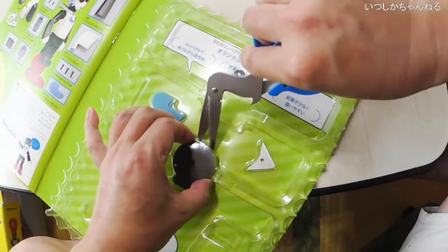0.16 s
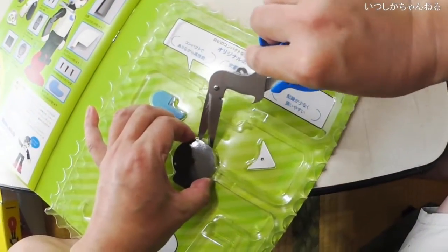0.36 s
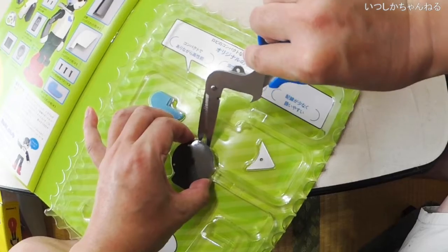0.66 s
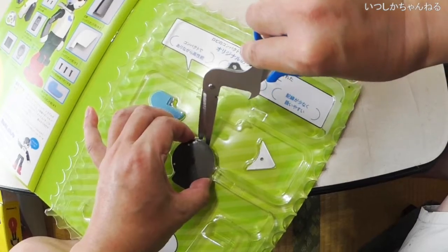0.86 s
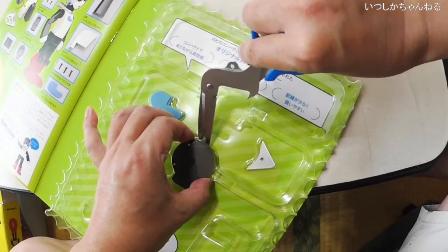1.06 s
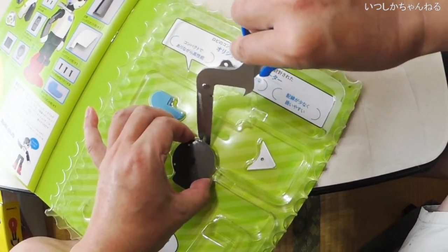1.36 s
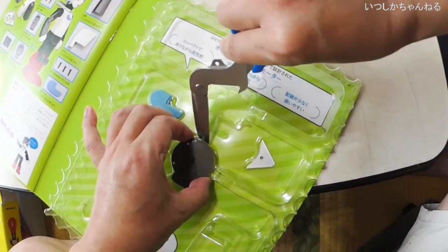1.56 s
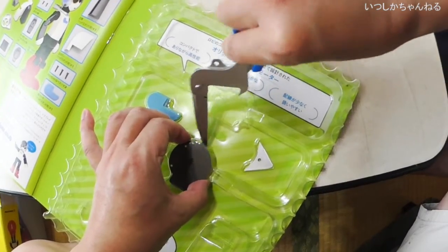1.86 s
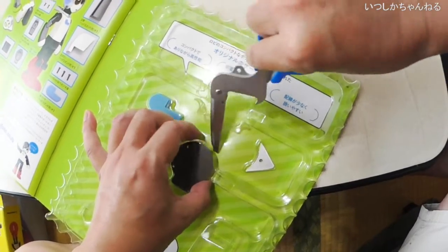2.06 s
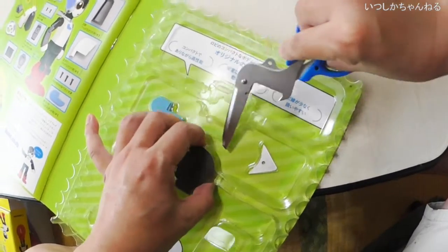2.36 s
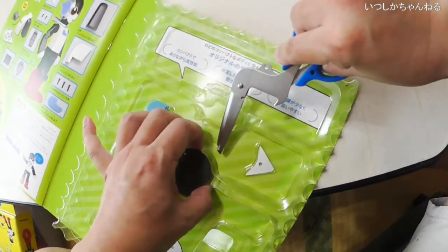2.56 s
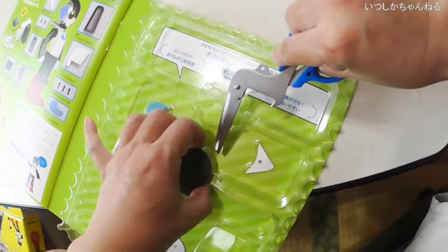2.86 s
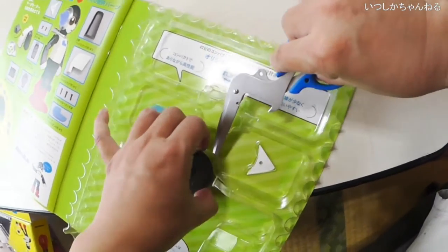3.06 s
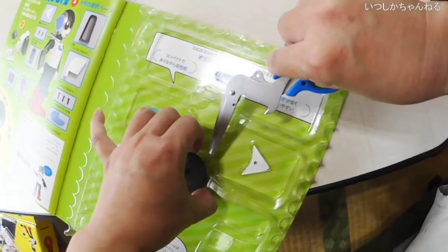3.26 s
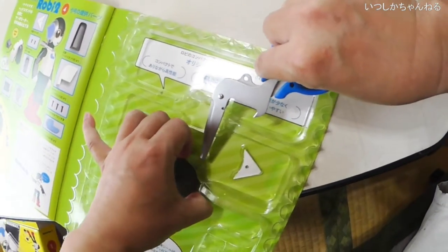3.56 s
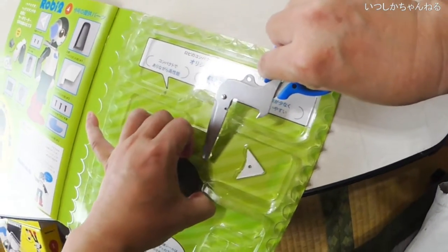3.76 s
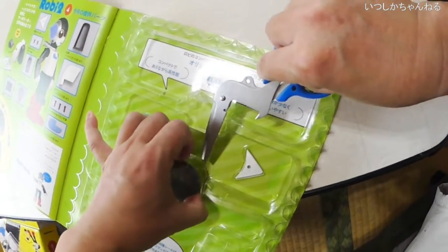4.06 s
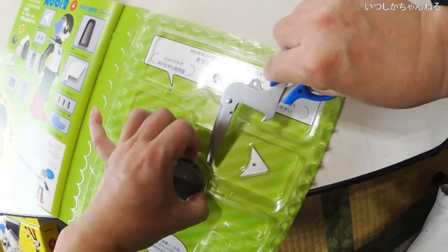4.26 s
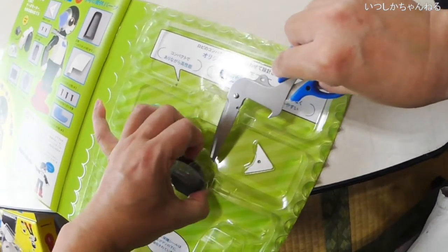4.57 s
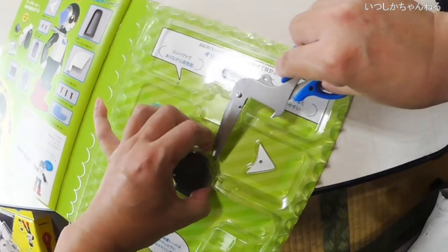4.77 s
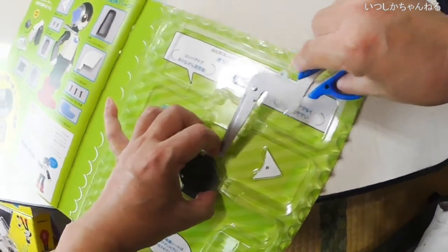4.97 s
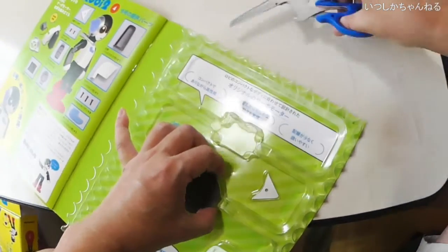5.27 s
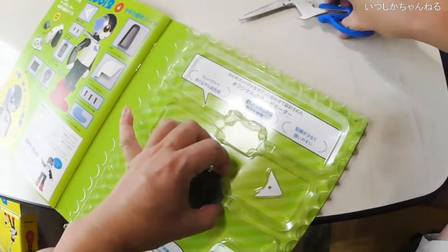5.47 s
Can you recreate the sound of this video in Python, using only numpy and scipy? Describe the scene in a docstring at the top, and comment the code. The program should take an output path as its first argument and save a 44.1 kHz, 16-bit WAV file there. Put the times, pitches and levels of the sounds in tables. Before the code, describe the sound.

A close indoor recording of scissors cutting a stiff, hollow plastic blister pack on a table. It opens with a short rustle and a quick run of crackling clicks, fading by 0.3 s. Sparse ticks and soft rubbing lead to a bright snap near 0.95 s. More light crackles follow from 1.2 s, then a hard snap at 1.8 s and a close pair around 2.0 s. Dense buckling and rustling continue, with snaps at 2.3, 2.4 and a strong one at 2.7 s. After a brief thinning, crackles build to snaps at 3.4 s, a heavy one at 3.8 s and a sharp pair at 3.9 s. It is quieter until about 4.5 s, then busy crinkling returns with clicks at 4.7 and 4.9 s. Rustling thins toward a last snap near 5.5 s. Short hollow ringing, slight overload, a small room's answer and faint fluctuating hiss accompany everything.

```python
"""Steel scissors work their way through a stiff plastic blister pack on a table in a small room.
Strokes of the blades rub and rustle (filtered noise), and the sheet buckles in runs of clicks (fading sines).
Where it gives way, a stronger click sounds; overload of the recorder adds a bright burst and a low thump.
Resonances of the hollow pack ring on, and noise tails make the room's brief answer.
Below lie a faint room tone and recorder hiss, which a noise suppressor lets through around the strokes."""
import sys
import numpy as np
from scipy import signal
from scipy.fft import rfft, irfft, next_fast_len
from scipy.io import wavfile
from scipy.ndimage import uniform_filter1d

SR = 44100
rng = np.random.default_rng(int(sys.argv[2]) if len(sys.argv) > 2 else 0)


def pcm_store(signal):
    """Save signal as 16-bit PCM."""
    levels = np.round(np.clip(np.atleast_2d(signal), -1, 1) * 32767)
    wavfile.write(sys.argv[1], SR, levels.astype(np.int16).T)


N = 248283  # length in samples

# The blades break through: t/s, flex level/dB, body level/dB, edge level/dB, overload burst level/dB,
# overload thump level/dB, share sent into the room/dB
BREAKTHROUGHS = [(0.9617, -28.5, -26, -27, -28, -34.5, -6),
                 (1.814, -22.5, -18.5, -18.5, -28.5, -35.5, -7.5), (2.0185, -34, -24, -28, -49, -55.5, -3),
                 (2.0377, -35.5, -22, -21.5, -40.5, -62, -11), (2.271, -36, -30.5, -26, -48, -55, -20.5),
                 (2.4205, -43, -20.5, -21, -46, -72, -10.5), (2.4925, -38.5, -34, -37.5, -42, -64.5, -10.5),
                 (2.722, -22.5, -17, -23.5, -31, -37, -14.5), (2.7894, -27.5, -28.5, -31, -43.5, -71, -21),
                 (3.4232, -35.5, -31, -25, -38, -61, -17), (3.4512, -32.5, -18.5, -21, -36, -63.5, -11),
                 (3.7845, -19, -16, -25.5, -45, -55.5, -9), (3.919, -37, -23.5, -26, -36.5, -60, -4.5),
                 (3.9447, -29, -17.5, -20.5, -27, -34.5, -22.5),
                 (4.6722, -26.5, -25, -25.5, -35.5, -48, -9), (4.9181, -38, -26, -29, -38, -50.5, -8.5),
                 (5.4664, -28, -29, -23.5, -33.5, -44, -2.5)]


def amp(db):
    """Turn decibels into a plain factor."""
    return 10 ** (np.asarray(db) / 20)


def unit(x):
    """Bring a sound to an average (RMS) strength of 1."""
    return x / np.sqrt(np.mean(x ** 2) + 1e-20)


def along(points, hz):
    """Read a curve of (frequency, value) points, on a log frequency axis."""
    f, value = np.transpose(points)
    return np.interp(np.log(hz + 1), np.log(f + 1), value)


def filtered(x, response):
    """Multiply the spectrum of x by a function of frequency, which may also shift phases."""
    size = next_fast_len(len(x) + SR // 4)
    hz = np.fft.rfftfreq(size, 1 / SR)
    return irfft(rfft(x, size) * response(hz), size)[:len(x)]


def causal(points, size=2048):
    """Make the most compact impulse response with this colour that starts at once (minimum phase)."""
    hz = np.fft.rfftfreq(size, 1 / SR)
    cepstrum = irfft(np.log(amp(along(points, hz))))
    # folding the second half onto the first moves the energy to the start
    cepstrum[1:size // 2] *= 2
    cepstrum[size // 2 + 1:] = 0
    return irfft(np.exp(rfft(cepstrum)))


def coloured(x, response):
    """Send x through an impulse response."""
    return signal.fftconvolve(x, response)[:len(x)]


def sized(x, db):
    """Give a click the energy of 10 ms of sound at this level."""
    energy = np.sum(x ** 2) / (SR / 100)
    return amp(db) * x / np.sqrt(energy + 1e-20)


def add(track, s, x):
    """Mix x into the track from time s, in seconds."""
    start = max(round(s * SR), 0)
    track[start:start + len(x)] += x[:max(len(track) - start, 0)]


def strokes():
    """Each rub builds, holds and lets go; returns its gain and the gain of the recorder hiss around it."""
    # strokes of the blades along the pack: pressure reached t/s, let go t/s, rub level/dB,
    # level of the hiss let through by the noise suppressor/dB
    blade_strokes = [(0, 0.106, -41, -66), (0.18, 1.03, -52.5, -74), (1.205, 1.877, -53, -73.5),
                     (1.955, 2.056, -41.5, -76), (2.19, 2.486, -47, -72), (2.61, 2.76, -40, -72),
                     (3.04, 3.46, -45.5, -76.5), (3.775, 3.943, -41, -75), (4.29, 4.516, -61, -92),
                     (4.58, 5.2, -51.5, -75.5), (5.2, 5.616, -47, -70.5)]
    press_db_per_s, release_db_per_s = 148, 238
    hiss_rise_db_per_s = 42.5  # after a pause the suppressor lets the hiss return slowly
    t = np.arange(N) / SR
    rub, hiss = np.zeros(N), np.zeros(N)
    for start, end, rub_db, hiss_db in blade_strokes:
        before = np.maximum(start - t, 0)
        released_db = release_db_per_s * np.maximum(t - end, 0)
        rub = np.maximum(rub, amp(rub_db - press_db_per_s * before - released_db))
        hiss = np.maximum(hiss, amp(hiss_db - hiss_rise_db_per_s * before - released_db))
    return rub, hiss


def rustle(gain, slips_per_s=280, spread_db=3.5, rub_db=-3, level_db=-1.25, slip_s=0.0011, patchy_db=2):
    """Many tiny scratchy slips over a smooth rub; the colour shifts as the contact wanders over the pack."""
    # colour of the rustle, with the recorder's notch near 5 kHz: f/Hz, level/dB
    rustle_colour = [(30, -26), (150, -26), (300, -12.5), (450, -8), (750, -0.5), (1200, -3.5),
                     (1800, -3.5), (2800, -13), (3800, -23), (4500, -53), (5700, -52.5), (6800, -38),
                     (9500, -34.5), (15000, -43)]
    chance, size = rng.random(N), rng.exponential(size=N)
    slips = (chance < slips_per_s / SR) * amp(spread_db * np.minimum(size, 2))
    slip_fade = np.exp(-np.arange(SR // 100) / SR / slip_s)
    friction = coloured(slips, slip_fade)
    grain = rng.standard_normal(N) * (unit(friction) + amp(rub_db))
    # smoothed random patches over frequency and time make the colour wander
    spectrum = signal.stft(grain, nperseg=512)[2]
    patches = uniform_filter1d(rng.standard_normal(spectrum.shape), size=6, axis=0)
    patches = unit(uniform_filter1d(patches, size=5, axis=1))
    grain = signal.istft(spectrum * amp(patchy_db * patches), nperseg=512)[1][:N]
    return amp(level_db) * gain * unit(coloured(grain, causal(rustle_colour)))


def background(hiss_gain, floor_db=-76.0):
    """Recorder hiss, let through by its noise suppressor around strokes, over a steady, dull room tone."""
    # colour of the recorder hiss: f/Hz, level/dB
    hiss_colour = [(40, -11), (3500, -14.5), (4600, -30), (5800, -27), (6800, -15), (9500, -7.5),
                   (12000, -14.5), (13800, 3.5), (15400, 4), (16300, -15.5)]
    floor_colour = [(40, 6.5), (1500, -4.5), (3500, -20), (5000, -38.5), (16000, -38)]  # f/Hz, level/dB
    hiss = unit(coloured(rng.standard_normal(N), causal(hiss_colour)))
    floor = unit(coloured(rng.standard_normal(N), causal(floor_colour)))
    return hiss_gain * hiss + amp(floor_db) * floor


def ring(t, lo_hz, hi_hz, t60, count, run_s=0.0015):
    """Modes of the creased sheet: every spot has its own, set off one after another as the crease runs."""
    place, strength, life, lag = rng.random((4, count, 1))
    # one mode at a random place in each of the equal frequency steps
    step = (np.arange(count)[:, None] + place) / count
    hz = lo_hz + (hi_hz - lo_hz) * step
    age = np.maximum(t - run_s * lag ** 2, 0)
    fade = amp(-60 * age / (t60 * (life + .5)))
    modes = np.cos(np.pi * strength) * np.sin(2 * np.pi * hz * age) * fade
    return np.sum(modes, axis=0)


def click(colour, flex_db, body_db, edge_db, ring_s, scratch_db=0):
    """One jump of the sheet: slow flexing lasts longest, the stiff edge dies first."""
    doubling_db = 36  # the ring lasts twice as long when flex outweighs edge by this much
    t = np.arange(SR // 12) / SR
    t60 = ring_s * 2 ** ((flex_db - edge_db) / doubling_db)
    flex = coloured(ring(t, 542.6, 1097.0, t60 * 0.93, count=7), colour)
    body = coloured(ring(t, 1118, 2091, t60 * 0.74, count=10), colour)
    # a tiny scratch spreads the click over all frequencies
    scratch = rng.standard_normal(len(t)) * amp(-60 * t / (t60 * 0.71))
    edge = sized(ring(t, 2025, 3611, t60 * 0.54, count=14), 0) + sized(scratch, scratch_db)
    edge = coloured(edge, colour)
    return sized(flex, flex_db) + sized(body, body_db) + sized(edge, edge_db)


def buckling_click(colour, db, bright_db):
    """A click of the bending sheet; the brighter it is, the more edge and the less flex."""
    flex_db, edge_db = -2.5, -2  # against the body, before the brightness tilts them
    base_ring_s = 0.035  # shorter than for a cut
    return click(colour, db + flex_db - bright_db, db, db + edge_db + bright_db, base_ring_s)


def buckles(colour, count=5):
    """The plastic bends under the blades: a tick, a click, then ever weaker ones as the crease creeps on."""
    # clicks of the buckling sheet: t/s, level/dB, brightness/dB, length of the run/s
    bends = [(.0061, -27, -4, 0.014), (.0256, -32, -2, 0.0035), (0.0377, -35.5, -1, 0.0033),
             (.0774, -40, 0.5, .004), (0.0978, -45.5, 5, 0.0036), (.1076, -38.5, -2, 0.019),
             (.175, -44.5, -0.5, 0.0037), (.2087, -42.5, -1.5, .004), (.2464, -29, -1.5, 0.0044),
             (.2623, -35, -2.5, 0.0048), (.2741, -33, 0, .004), (.4136, -53, -1, .004),
             (0.6108, -33.5, 2.5, 0.0033), (.7004, -41, 0.5, .004), (.7768, -39, -1, 0.0024),
             (.7913, -44, -1.5, .004), (.9356, -41, -2, 0.01), (1.2149, -35.5, 2, 0.014),
             (1.2806, -44.5, -4, .004), (1.3258, -43.5, 2.5, 0.0033), (1.4181, -38.5, 4, 0.0028),
             (1.4457, -34, 2, 0.0037), (1.657, -46, -6.5, 0.003), (1.7492, -47, 3.5, .004),
             (1.801, -42, 8, 0.0045), (1.992, -31.5, 0.5, 0.0333), (2.1014, -40.5, -2, 0.01),
             (2.1445, -37, -5.5, 0.013), (2.1708, -29, 4, 0.0029), (2.2091, -31, -0.5, 0.0051),
             (2.2358, -41, 2, 0.013), (2.3145, -39.5, -5, .008), (2.3348, -34.5, 1, 0.0045),
             (2.3783, -43.5, 5, 0.0029), (2.3957, -33, 7, 0.0075), (2.5916, -37, 0.5, .004),
             (2.6055, -29.5, -6, 0.016), (2.6911, -37, 4.5, .02), (2.8846, -49.5, -8.5, 0.0041),
             (2.9934, -39, 2, 0.012), (3.0326, -41.5, 1, 0.0044), (3.1029, -41.5, -2, 0.016),
             (3.2674, -40, -2, 0.031), (3.3002, -34, 0.5, 0.017), (3.3159, -30, 3.5, 0.0049),
             (3.3411, -36.5, -1, .018), (3.5667, -40.5, 4.5, 0.0035), (3.6093, -44, -2.5, 0.045),
             (3.6639, -38.5, -2, 0.043), (3.7454, -35.5, -1.5, 0.045), (3.7897, -29.5, -10, 0.006),
             (3.9103, -38, 3, .008), (4.0581, -53.5, 5.5, 0.0035), (4.1453, -42, 0.5, 0.006),
             (4.2171, -47.5, 2.5, 0.016), (4.327, -65.5, 9.5, 0.0029), (4.4907, -50.5, 2, .004),
             (4.5353, -43, -1, 0.0192), (4.5722, -47, -3, .012), (4.6097, -35.5, 1, 0.0114),
             (4.6765, -26.5, -4, 0.005), (4.7483, -32.5, 2, 0.012), (4.8115, -37.5, 0.5, 0.0027),
             (4.8399, -36.5, -5, 0.027), (4.8637, -37, -1.5, 0.0077), (4.957, -44.5, 1, 0.051),
             (5.0396, -34, -1, 0.019), (5.0607, -38, -3.5, 0.013), (5.2427, -43, -1, 0.017),
             (5.429, -43.5, -2.5, .02)]
    lead_s, lead_db = 0.002397, -18  # a weak tick as the crease starts to give, just before it buckles
    gap_s, fade_db = .0095, 11.5  # average gap in a run; how far clicks fade over the run's length
    track = np.zeros(N)
    for s, db, bright_db, length_s in bends:
        add(track, s - lead_s, buckling_click(colour, db + lead_db, bright_db))
        add(track, s, buckling_click(colour, db, bright_db))
        delays = gap_s * (np.arange(count) + .5 + rng.random(count))
        for delay in delays:
            faded_db = db - fade_db * delay / length_s
            add(track, s + delay, buckling_click(colour, faded_db, bright_db))
    return track


def crinkles(colour, rub, per_s=14, level_db=-2.5, bright_spread_db=3, count=120):
    """Stray small clicks at random moments, as strong as the rub that sets them off."""
    track = np.zeros(N)
    keep_chance = per_s * N / SR / count  # only some of the candidates sound
    for place, chance in rng.random((count, 2)):
        bright_db = bright_spread_db * rng.standard_normal()
        if chance < keep_chance:
            at = int(place * N)
            add(track, at / SR, rub[at] * buckling_click(colour, level_db, bright_db))
    return track


def shell(x):
    """The hollow pack rings on in sympathy, through a set of narrow resonances."""
    # resonances of the hollow pack: f/Hz, width/Hz, relative level/dB
    resonances = [(585, 2.5, -2.5), (814.5, 79, 2), (940, 20, -8), (1630, 38, 1.5), (1830, 27, -15.5),
                  (2550, 57, -12.5)]

    def response(f):
        """Add up the resonances, each strongest at its own frequency."""
        total = 0
        for hz, width, db in resonances:
            damping = 1j * f * width
            total = total + amp(db) * damping / (hz * hz - f * f + damping)
        return total

    return filtered(x, response)


def room(x, count=20, build_s=0.012):
    """The walls answer with noise tails, drawn anew for each equal stretch to vary their colour."""
    # time the room takes to fade by 60 dB: f/Hz, t60/s
    fade_times = [(200, 0.0056), (1000, 0.2115), (3000, 0.22), (7000, 0.27), (10000, 0.29), (15000, 0.05)]
    # colour of the room's answer: f/Hz, relative level/dB
    answer_colour = [(100, -20), (600, 7), (3000, -1.5), (7000, -0.5), (10000, -7.5), (12000, -2),
                     (14500, -15.5)]
    wet = np.zeros(N)
    for k in range(count):
        hz, t, spectrum = signal.stft(rng.standard_normal(SR // 3), SR, nperseg=256)
        # the reflections thicken over a few milliseconds, then each frequency dies at its own speed
        fade_db = 60 * t / along(fade_times, hz)[:, None]
        build = 1 - np.exp(-(t / build_s) ** 2)
        gain = amp(along(answer_colour, hz)[:, None] - fade_db) * build
        loudness = np.sqrt(np.sum(gain[6] ** 2) * 128)  # taken from the band near 1 kHz
        tail = signal.istft(spectrum * gain / loudness, SR, nperseg=256)[1]
        start, end = k * N // count, (k + 1) * N // count
        add(wet, start / SR, signal.fftconvolve(x[start:end], tail))
    return wet


def cuts(colour, burst_s=0.0057, thump_s=0.00026):
    """Each snap clicks, with a burst and a low thump for overload; returns near sound and room share."""
    # colour of the bright overload burst: f/Hz, level/dB
    burst_colour = [(4000, -35.5), (5700, -38), (6700, -12), (7900, -27.5), (9000, -8), (10400, -10),
                    (11400, -26), (12600, -19), (13700, 0.5), (15400, 2.5), (16000, -5), (17000, -36.5)]
    burst_lead_s = 0.00091  # burst and thump start this long before the click
    base_ring_s = 0.03932
    near, sent = np.zeros(N), np.zeros(N)
    t = np.arange(SR // 12) / SR
    bright = causal(burst_colour)
    for s, flex_db, body_db, edge_db, burst_db, thump_db, room_db in BREAKTHROUGHS:
        # a few milliseconds of noise with a weak tail
        burst_shape = np.exp(-(t / burst_s) ** 4) + .07 * amp(-60 * t / .022)
        noise = rng.standard_normal(len(t)) * burst_shape
        burst = sized(coloured(noise, bright), burst_db)
        thump = sized(t * np.exp(-t / thump_s), thump_db)
        snap = burst + thump
        add(snap, burst_lead_s, click(colour, flex_db, body_db, edge_db, base_ring_s))
        add(near, s - burst_lead_s, snap)
        add(sent, s - burst_lead_s, amp(room_db) * snap)
    return near, sent


def settling(level_db=-15.5, fade_db_per_s=178.5, delay_s=.011):
    """Gain of the rustle after each cut: the stronger its flex and edge, the more the sheet springs back."""
    gain, t = np.zeros(N), np.arange(SR // 2) / SR
    for s, flex_db, _, edge_db, *_ in BREAKTHROUGHS:
        start_db = (flex_db + edge_db) / 2 + level_db
        add(gain, s + delay_s, amp(start_db - fade_db_per_s * t))
    return gain


def scene(shell_db=-9, room_db=-11):
    """The pack on its table and the room around it: near sounds, sympathetic ring, room answer and hiss."""
    # colour of the clicks as the recorder passes them, with its notch near 5 kHz: f/Hz, level/dB
    click_colour = [(30, -27.5), (250, -16.5), (450, -14.5), (800, -5), (1700, 2.5), (2700, 1),
                    (3300, -8.5), (3900, -10.5), (4500, -35), (5700, -36.5), (6800, -24), (9500, -19),
                    (12000, -23.5), (15000, -26)]
    colour = causal(click_colour)
    rub, hiss = strokes()
    snaps, sent = cuts(colour)
    rustling = rustle(np.hypot(rub, settling()))
    crinkling = rustling + crinkles(colour, rub) + buckles(colour)
    near = snaps + crinkling
    ringing = amp(shell_db) * shell(near)
    answer = room(sent + amp(room_db) * crinkling)
    return (near + ringing + answer + background(hiss))[None]


def record(dry):
    """The recorder keeps next to nothing above its band limit: a very steep low-pass filter."""
    top_hz = 16100
    return filtered(dry[0], lambda hz: 1 / np.sqrt(1 + (hz / top_hz) ** 120))[None]


dry = scene()
out = record(dry)
pcm_store(out)
```